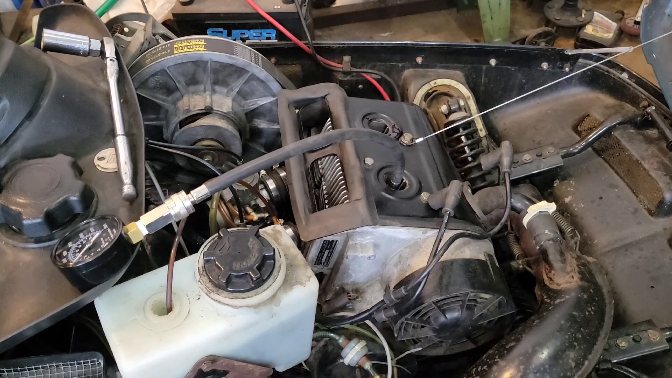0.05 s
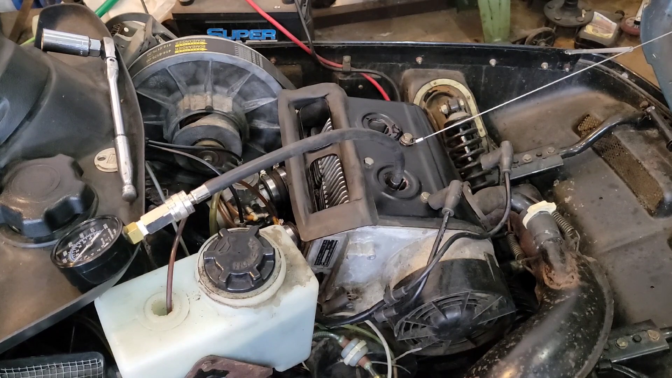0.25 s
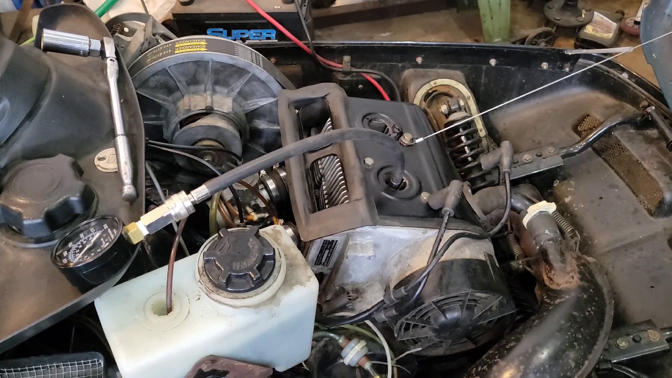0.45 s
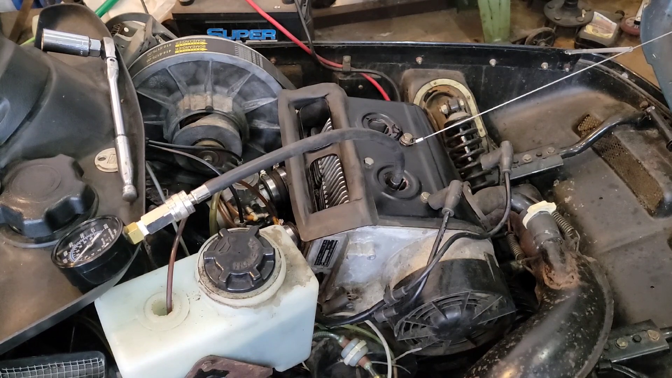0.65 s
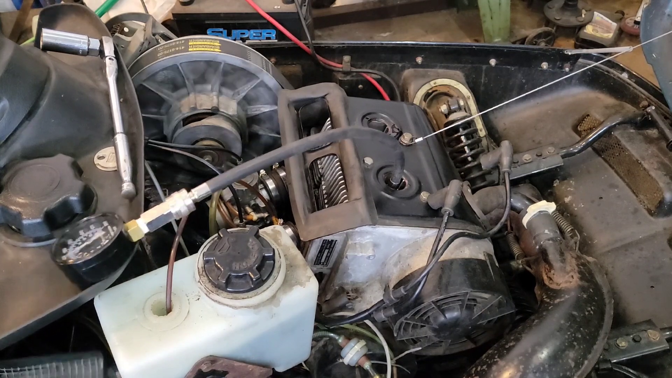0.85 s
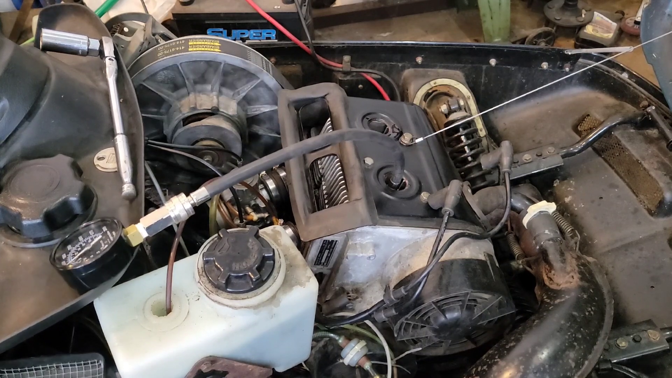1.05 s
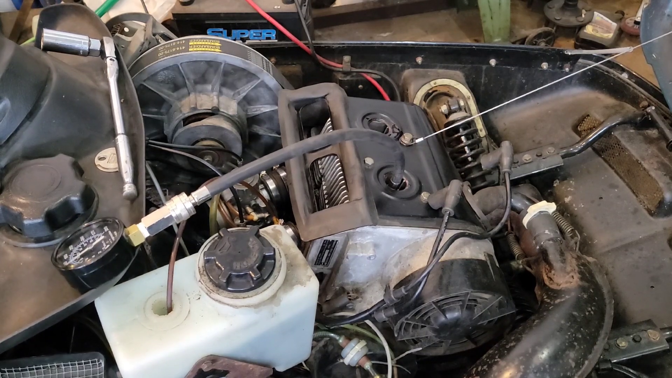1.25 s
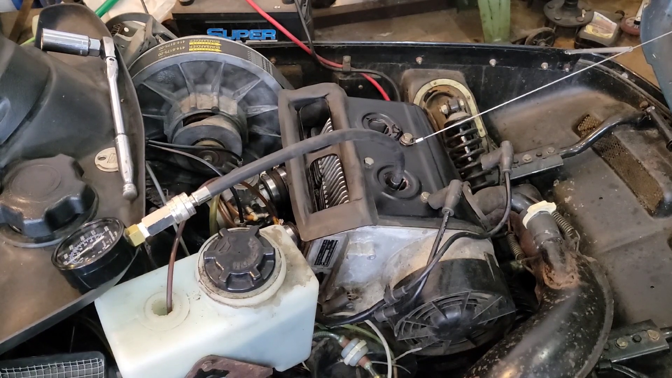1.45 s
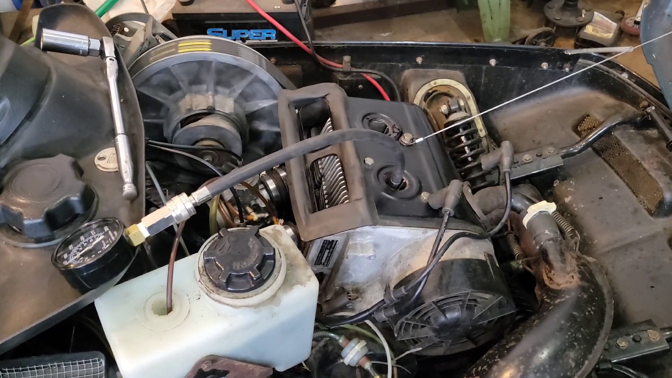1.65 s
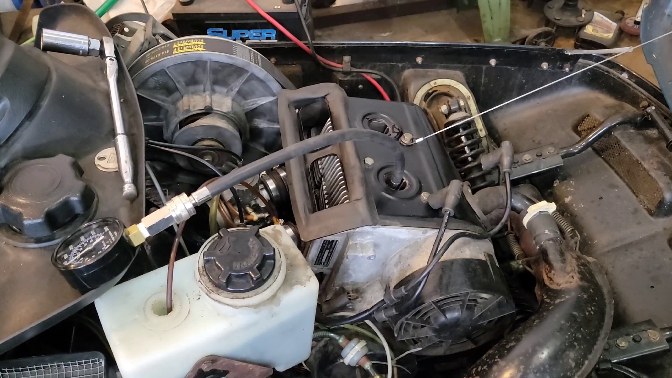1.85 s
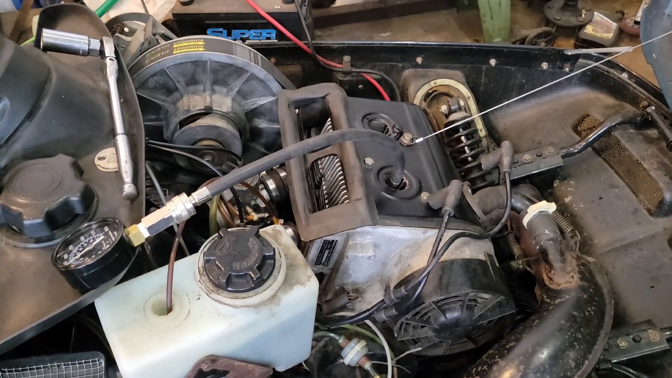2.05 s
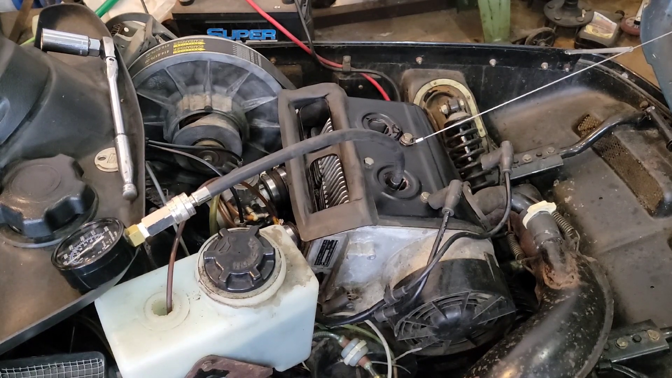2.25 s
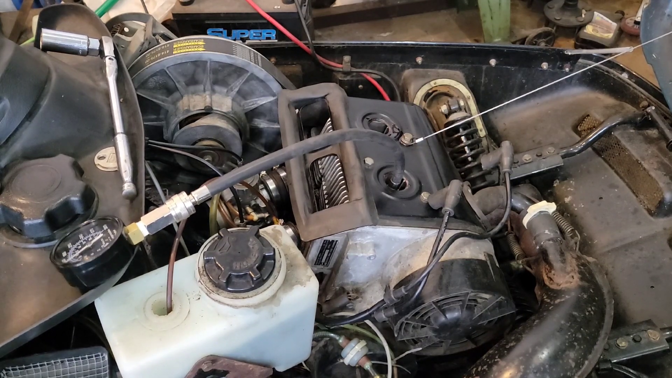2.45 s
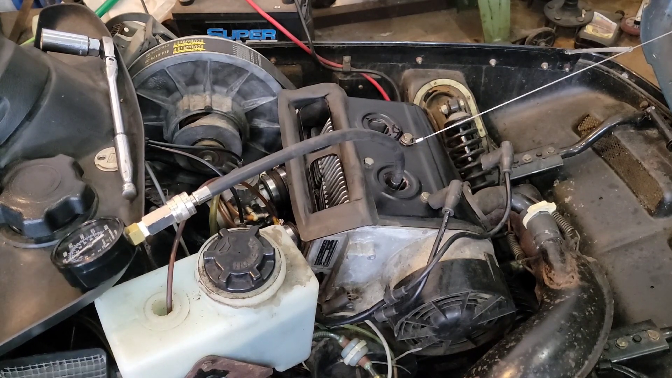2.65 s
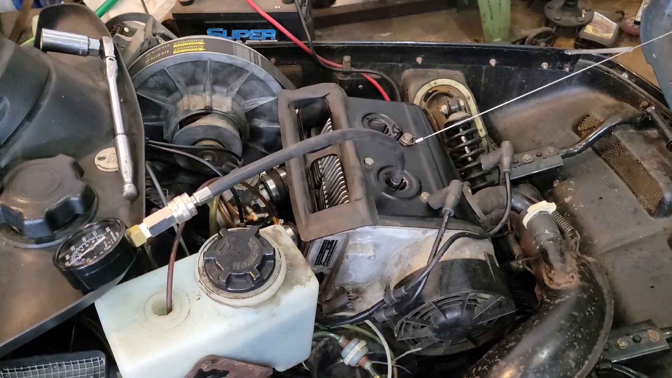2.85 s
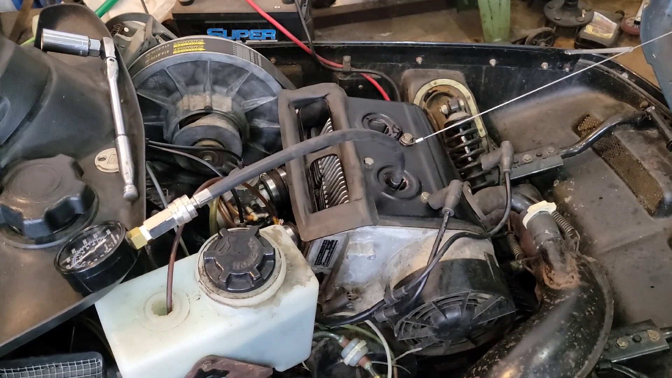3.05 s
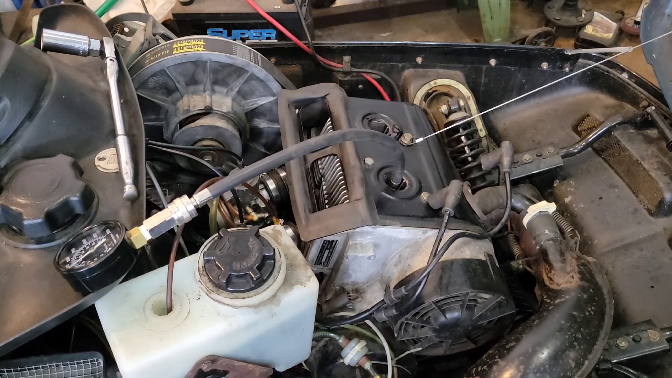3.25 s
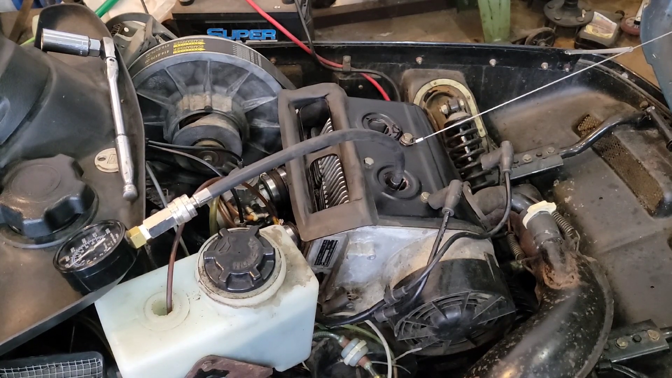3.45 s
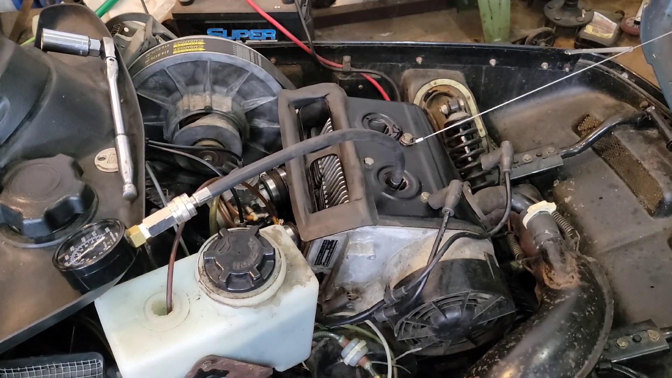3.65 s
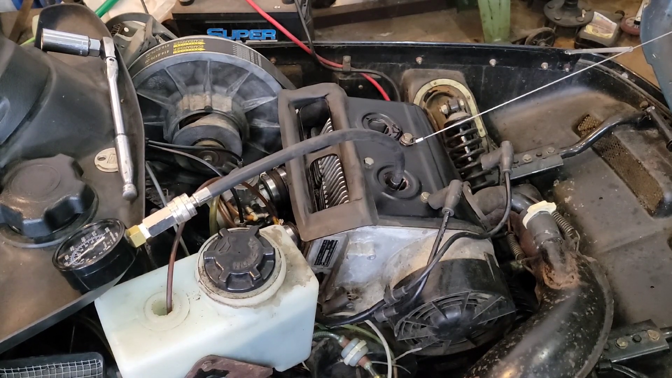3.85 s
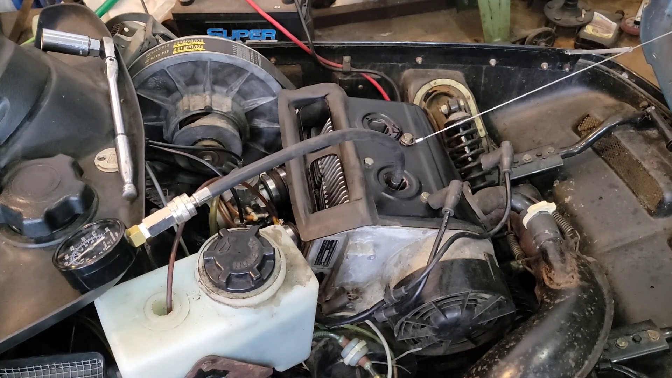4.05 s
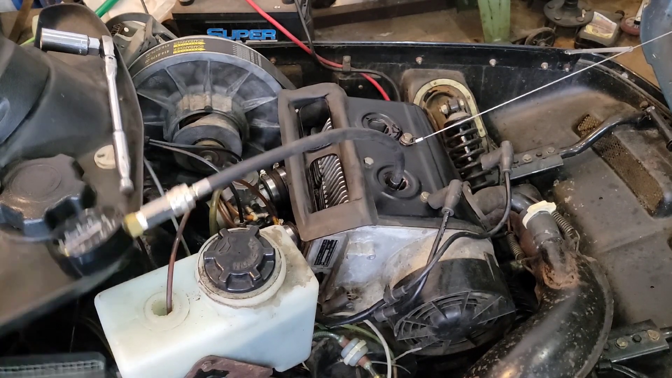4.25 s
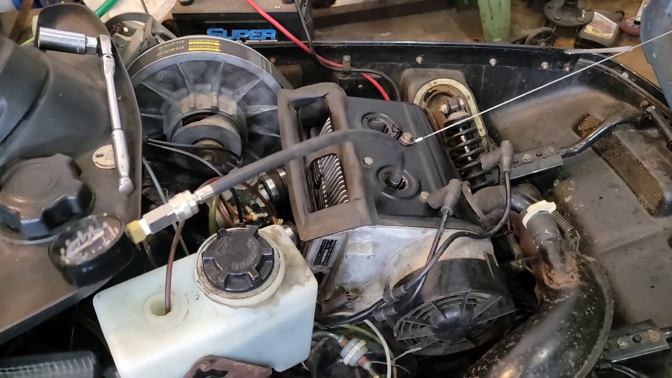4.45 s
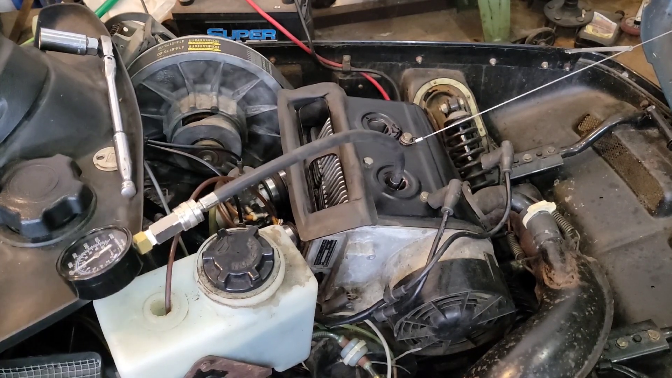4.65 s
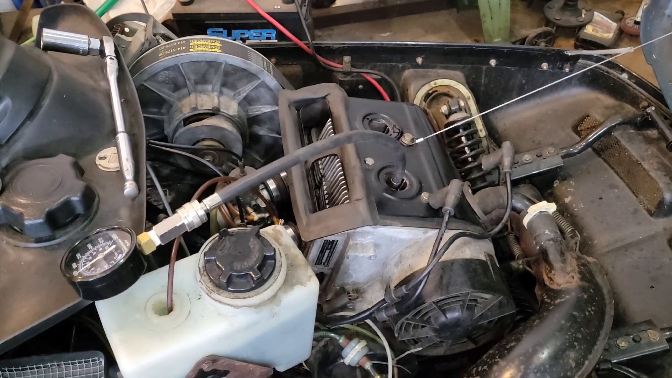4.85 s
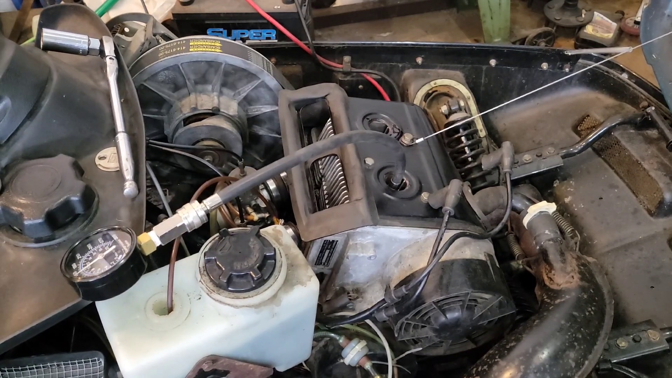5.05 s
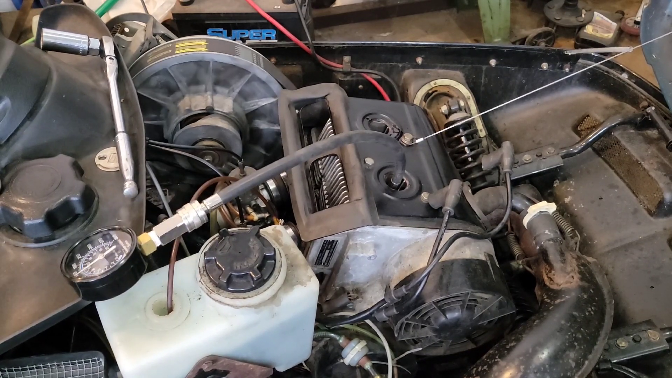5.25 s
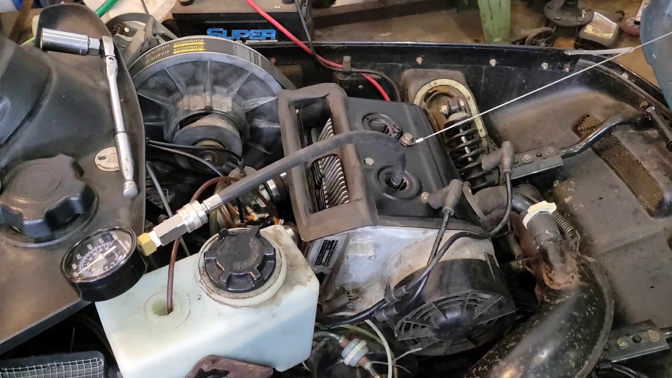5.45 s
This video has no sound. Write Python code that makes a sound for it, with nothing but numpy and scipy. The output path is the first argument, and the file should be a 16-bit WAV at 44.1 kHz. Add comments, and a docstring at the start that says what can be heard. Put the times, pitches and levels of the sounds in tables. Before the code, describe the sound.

A small two-stroke engine is pulled over twice by its starter rope in a garage, chugging briefly with clacks but never firing.

```python
"""A two-stroke twin is pulled over twice by its recoil rope in a garage and never fires.
A compression gauge sits in one plug hole: that cylinder booms into the exhaust, the open one gulps air.
On each pull the crank runs up, holds and coasts; its speed sets the whirr of fan and rings.
The starter clacks, pawls ring, the rope zips and air spurts through the gauge valve. Between the pulls
the rope winds back and its handle knocks; at the end of the second pull the body panels shudder."""
import sys
import numpy as np
from scipy import signal
from scipy.fft import rfft, irfft, next_fast_len
from scipy.io import wavfile
from scipy.ndimage import uniform_filter1d

SR = 44100
rng = np.random.default_rng(int(sys.argv[2]) if len(sys.argv) > 2 else 0)


def wrap_up_sound(samples):
    """Save the sound to the file named by the first command line argument, as 16-bit audio."""
    columns = np.atleast_2d(samples).T
    # keep every value between -1 and 1, then stretch to whole-number steps
    tamed = np.clip(columns, -1, 1)
    steps = np.round(tamed * 32767).astype(np.int16)
    wavfile.write(sys.argv[1], SR, steps)


N = 242991
TIME = np.arange(N) / SR


def pistons():
    """Both cylinders and the crankcase; little radiates below 40 Hz."""
    radiation = signal.butter(4, 40, "high", fs=SR, output="sos")
    return signal.sosfilt(radiation, closed_cylinder() + open_cylinder() + crankcase())


# closed-cylinder strokes: (time [s], level [dB], pitch [Hz], length [s], swell [s])
BOOMS = [(0.785, -35.5, 93.5, 0.064, 0.0044), (0.979, -4, 94, 0.06, .004),
         (1.088, -2.5, 102.8, 0.082, 0.017), (1.19, -4, 100, 0.074, 0.0023),
         (1.315, -7.5, 97.9, .093, 0.0039), (1.48, -7.5, 80.4, .058, 0.0046),
         (1.748, -19.5, 87, 0.067, 0.0067), (4.337, -28, 86, 0.06, 0.0035),
         (4.527, -5.5, 100.9, 0.11, 0.0035), (4.633, -5, 103.5, 0.087, 0.012),
         (4.741, -6.5, 93.3, 0.051, 0.0048), (4.879, -13, 87, 0.084, .01),
         (5.065, -13.5, 85.6, .047, 0.0036)]
# exhaust resonances: (frequency [Hz], width [Hz], gain [dB])
EXHAUST_PEAKS = [(317.6, 27, 2), (384, 25, -7.5)]
# pipe modes: (frequency [Hz], gain [dB], t60 [s])
PIPE_MODES = [(60.5, -16, 0.35), (65, -9.5, 0.19), (77.7, -6.5, 0.69), (104, -24, 1)]
def closed_cylinder(sag=0.25, sag_s=0.022, third_db=-25, flutter=0.13, growl_db=-18):
    """Each stroke pushes out a boom that sags in pitch; the exhaust growls and the pipe rings."""
    booms, flow, age = np.zeros(N), np.zeros(N), TIME[:SR // 5]
    for s, db, hz, length_s, swell_s in BOOMS:
        pitch_hz = hz * (1 + sag * (np.exp(-age / sag_s) - .25))
        phase = 2 * np.pi * np.cumsum(pitch_hz) / SR
        envelope = from_db(db) * (1 - np.exp(-age / swell_s)) * np.exp(-(age / length_s) ** 2)
        span = slice(int(s * SR), int(s * SR) + len(age))
        booms[span] += envelope * (np.sin(phase) + from_db(third_db) * np.sin(3 * phase))
        flow[span] += envelope
    growl = from_db(growl_db) * flow * resonate(rng.standard_normal(N), EXHAUST_PEAKS)
    pipe = strike(*np.transpose(BOOMS)[:2], PIPE_MODES)
    return booms * (1 + flutter * drift(160)) + growl + pipe


# open-cylinder strokes: (time [s], gulp [dB], knock [dB])
GULPS = [(0.917, -7.5, -6.5), (1.044, -6.5, -5), (1.146, -12, -6), (1.254, -8, -6.5), (1.394, -8, -8),
         (1.602, -18.5, -17), (4.469, -7, -4), (4.591, -8, -5.5), (4.691, -6, -7), (4.798, -5.5, -10),
         (4.943, -13.5, -13), (5.039, -14, -15), (5.147, -20, -22), (5.307, -21.5, -32)]
# engine case modes: (frequency [Hz], gain [dB], t60 [s])
CASE_MODES = [(202, -18.5, 0.018), (319.8, -15, 0.38), (397.5, 1, 0.072), (490, -5.5, 0.054),
              (490, -15, 0.033), (734, -20.5, 0.04)]
# dull thud: (frequency [Hz], density [dB])
THUD_SPECTRUM = [(55, -9.5), (130, -11), (370, -5), (520, -6.5), (900, -39)]
def open_cylinder(gulp_hz=110, swell_s=0.0079, fade_s=0.017):
    """Air is gulped through the open plug hole: a low pulse, a pipe ring and a hollow knock."""
    gulps = np.zeros(N)
    for s, db, _ in GULPS:
        age = TIME - s - .001
        envelope = np.exp(np.maximum(np.minimum(age / swell_s, -age / fade_s), -20))
        gulps += from_db(db) * envelope * np.sin(2 * np.pi * gulp_hz * age)
    s, gulp_db, knock_db = np.transpose(GULPS)
    pipe = strike(s, gulp_db, PIPE_MODES)
    knock = strike(s - .001, knock_db - 1.5, CASE_MODES)
    air = colour(bursts(s - .002, knock_db - 12.5, t60_s=0.029, rise_s=0.00082), THUD_SPECTRUM)
    return gulps + pipe - knock + air


def crank_speed(age, run_up_s=.225, full_speed_s=.08, let_go_s=.271, coast_s=.447):
    """Share of top speed against time from the first stroke: run up, hold, coast."""
    run_up = np.clip(1 + (age - full_speed_s) / run_up_s, 1e-4, 1)
    return run_up * np.exp(-np.maximum(age - let_go_s, 0) / coast_s)


# rope pulls: (first stroke [s], spin noise trim [dB])
PULLS = [(0.912, 0.3), (4.459, 0.1)]
# crankcase resonances: (frequency [Hz], width [Hz], gain [dB])
CRANKCASE_PEAKS = [(53, 11, -8.5), (76, 5.7, 1), (131, 30, -1.5), (165, 40, -3)]
def crankcase(top_db=-21.5, speed_exponent=1.89, swell_s=0.063):
    """Air churning in the crankcase rumbles and dies away with crank speed."""
    speed = sum(crank_speed(TIME - s) * np.clip((TIME - s) / swell_s, 0, 1) for s, _ in PULLS)
    rumble = resonate(friction(900, spread_db=3.5, flutter_db=2), CRANKCASE_PEAKS)
    return from_db(top_db) * speed ** speed_exponent * rumble


# fan and rings, rows whirr, rasp, hiss: (level at top speed [dB], speed exponent)
SPIN_NOISE = [(-19.5, 1.49), (-32, 1.22), (-48, 1.1)]
# slack rope in its guide, one curve per slide: (time [s], level [dB])
SLIDES = [
    [(0.0, -60), (0.25, -64), (0.66, -67), (0.76, -49)],
    [(2.48, -67), (2.53, -41.5), (2.76, -42), (3.05, -50.5), (3.21, -62.5), (3.62, -54.5), (3.88, -67.5),
     (4.27, -76)],
]
# noise of the sliding rope: (whirr [dB], rasp [dB], hiss [dB])
SLIDE_NOISE = (0, -4, -31.5)
# noise of the shaking panels: (whirr [dB], rasp [dB], hiss [dB])
SHUDDER_NOISE = (-9, -18.5, -26.5)
def rubbing_levels_db():
    """Whirr, rasp and hiss levels: power sum of spinning crank, sliding rope and panel shudder."""
    top_db, exponent = np.transpose(SPIN_NOISE)[:, :, None]
    parts_db = []
    for s, trim_db in PULLS:
        speed_db = 20 * np.log10(crank_speed(TIME - s))
        take_up_db = -166 * np.clip(s - TIME, 0, 1)   # swells as the rope takes the load
        parts_db.append(top_db + trim_db + exponent * speed_db + take_up_db)
    parts_db += [np.array(SLIDE_NOISE)[:, None] + curve_db(slide) for slide in SLIDES]
    parts_db += [np.array(SHUDDER_NOISE)[:, None] + curve_db(SHUDDER)]
    return 10 * np.log10(sum(from_db(db) ** 2 for db in parts_db))


# rubbing noise bands: (frequency [Hz], density [dB])
WHIRR_SPECTRUM = [(50, 3), (110, 3.5), (230, -7.5), (350, -4.5), (550, -15.5), (800, -9), (1300, -6),
                  (1800, -13.5), (2800, -17.5)]
RASP_SPECTRUM = [(1000, -17), (1700, 0.5), (2700, -1), (3900, -5), (5000, -7.5), (6500, -9.5), (7600, -37),
                 (10000, -39.5)]
HISS_SPECTRUM = [(5500, -4.5), (7000, 5), (8200, -11), (10500, -5), (13200, -1.5), (15500, -6)]
# fan housing resonances: (frequency [Hz], width [Hz], gain [dB])
HOUSING_PEAKS = [(363.4, 12, 0), (501, 29, 3), (622.7, 8.9, 0), (729, 23, 0), (846, 67, -2.5),
                 (1002, 8.4, -2.5), (1405, 82, -14), (1780, 73, -6.5)]
def rubbing():
    """Rope, fan and rings rub: a whirr coloured by the housing, a gritty rasp, a fine hiss."""
    whirr_db, rasp_db, hiss_db = rubbing_levels_db()
    whirr = colour(friction(5000, spread_db=0, flutter_db=3.5), WHIRR_SPECTRUM)
    housing = resonate(friction(1500, spread_db=3.5, flutter_db=4), HOUSING_PEAKS)
    rasp = colour(friction(2500, spread_db=3, flutter_db=6), RASP_SPECTRUM)
    hiss = colour(friction(11000, spread_db=-0.5, flutter_db=3), HISS_SPECTRUM)
    return (from_db(whirr_db + 1) * whirr + from_db(whirr_db - 4) * housing
            + from_db(rasp_db + 2.5) * rasp + from_db(hiss_db + 4) * hiss)


# starter and housing contacts: (time [s], body [dB], crack [dB])
CLACKS = [(0.7724, -22, -18), (0.841, -20, -14.5), (0.8979, -18, -3), (1.0482, -8.5, -26),
          (1.058, -11, -26), (1.4877, -23, -18.5), (1.7237, -24.5, -21), (2.571, -36, -20),
          (2.583, -43, -29), (2.792, -37, -23), (2.88, -44, -27.5), (4.305, -31.5, -27),
          (4.371, -21.5, -23), (4.4442, -15.5, -4), (4.515, -9.5, -13.5), (4.713, -17, -12.5),
          (4.801, -58, 1), (4.8487, -13.5, -3), (4.981, -26, -15.5), (5.037, -17, -9), (5.141, -13.5, -5.5),
          (5.162, -22.5, -21), (5.25, -21, -10)]
# pawls landing in their cup: (time [s], pawl ring [dB], cup ring [dB], crack [dB], scrape [dB])
PAWL_HITS = [(1.321, -13.5, -38, -9, -53), (1.3452, -16, -19, -11.5, -47), (2.029, -57, -42, -21, -35),
             (2.038, -21, -50, -22, -41.5), (2.232, -43, -46, -22.5, -58), (2.242, -37, -50, -28, -60)]
# midrange of a hard contact: (frequency [Hz], density [dB])
KNOCK_SPECTRUM = [(300, -20.5), (560, -1), (760, 0.5), (1050, -3), (1450, -8), (2400, -23)]
def starter_clacks(pawl_body_db=-14.5):
    """Hard contacts whose treble dies first; the pawls scrape on briefly."""
    pawl_clacks = [(s, db + pawl_body_db, db) for s, _, _, db, _ in PAWL_HITS]
    s, body_db, crack_db = np.transpose(CLACKS + pawl_clacks)
    thud = colour(bursts(s, body_db - 6, t60_s=0.3, rise_s=0.003), THUD_SPECTRUM)
    clack = colour(bursts(s, body_db + 7, t60_s=0.083, rise_s=0.0029), KNOCK_SPECTRUM)
    crack = colour(bursts(s, crack_db - 3, t60_s=0.041, rise_s=0.0012), RASP_SPECTRUM)
    tick = colour(bursts(s, crack_db - 12, t60_s=0.022, rise_s=0.0011), HISS_SPECTRUM)
    pawl_s, *_, scrape_db = np.transpose(PAWL_HITS)
    scrape = colour(bursts(pawl_s, scrape_db, t60_s=0.078, rise_s=0.002), HISS_SPECTRUM)
    return thud + clack + crack + tick + scrape


# pawl and starter cup modes: (frequency [Hz], gain [dB], t60 [s])
PAWL_MODES = [(1755, -9, .12), (2024, -2, .04), (2520, -4, .03), (2805, 0, .025), (2965, -17.5, .36),
              (3020, -.5, .03), (3048, -16, .36), (3180, -5, .035), (3850, -7, .02), (5700, -8, .06)]
CUP_MODES = [(1475, -1.5, 0.22), (1684, -4, 0.18), (2180, 1.5, .07), (2517, -3, .14), (3330, -5, .1),
             (4540, 0.5, .06), (4610, -10.5, .14), (5780, -11.5, .1)]
def pawls(skid_s=0.00077):
    """Pawl and cup ring, driven by the short skid of each landing."""
    s, pawl_db, cup_db, _, _ = np.transpose(PAWL_HITS)
    age = TIME[:SR // 8]
    skid = rng.standard_normal(len(age)) * age * np.exp(-age / skid_s)
    white_skid = irfft(flatten(rfft(skid)))[:len(age) // 2]
    ringing = strike(s, pawl_db, PAWL_MODES) + strike(s, cup_db, CUP_MODES)
    return signal.fftconvolve(ringing, white_skid)[:N]


# braid over the guide, per pull: (time from first stroke [s], strand rate [1/s], level [dB])
ROPE_RUN = [(-.14, 550, -45.5), (-.06, 740, -19), (.065, 1000, -22.5), (.2, 1050, -37), (.39, 900, -50.5),
            (.55, 780, -64)]
def rope(jitter=.13):
    """Strands tick unevenly over the guide: a raspy zip that rises and falls with their rate."""
    pulls = [[(s + age, per_s, db) for age, per_s, db in ROPE_RUN] for s, _ in PULLS]
    per_s, db = in_time(np.vstack(pulls))
    pulling = sum((TIME > pull[0][0]) & (TIME < pull[-1][0]) for pull in pulls)
    strands = np.floor(np.cumsum(per_s * (1 + jitter * drift(500))) / SR)
    ticks = np.diff(strands, prepend=0) * (1 + rng.standard_normal(N))
    peaks = [(780, 490, 6.5), (1696, 1070, 1.0), (3020, 1200, -1.5), (4200, 3000, -13)]
    return pulling * from_db(db) * resonate(ticks, peaks)


# panel shake: (time [s], level [dB])
SHUDDER = [(4.845, -23), (4.858, -7.5), (4.935, -11), (4.97, -14.5), (5.016, -16.5), (5.036, -11.5),
           (5.102, -16), (5.17, -18.5), (5.51, -47)]
# panel resonances: (frequency [Hz], width [Hz], gain [dB])
PANEL_PEAKS = [(184.3, 24, 4.5), (272.6, 56, 5), (344, 74, 5), (400, 48, 4), (485, 70, -0.5),
               (590, 58, -5.5), (650, 25, -6.5)]
def panels():
    """The body panels rattle as the second pull runs out."""
    level_db = np.interp(TIME, *np.transpose(SHUDDER), left=-120) - 5
    return from_db(level_db) * resonate(friction(2000, spread_db=1.5, flutter_db=2), PANEL_PEAKS)


# valve spurts: (time [s], level [dB], t60 [s])
SPURTS = [(0.897, -22.5, 0.34), (1.487, -26, 0.038), (4.436, -19.5, 0.25), (4.843, -24, 0.37)]
# air jet: (frequency [Hz], density [dB])
AIR_SPECTRUM = [(1500, -12.5), (3700, -7), (6300, 13), (8000, -5), (11000, 1), (13300, 9), (15500, -14)]
def gauge_valve():
    """Compressed air hisses past the valve."""
    return colour(bursts(*np.transpose(SPURTS), rise_s=0.0015), AIR_SPECTRUM)


# gauge fitting knocks: (time [s], level [dB])
FITTING_HITS = [(4.712, -46), (4.7745, -29.5), (4.803, -19)]
# fitting modes: (frequency [Hz], gain [dB], t60 [s])
FITTING_MODES = [(1813, 9, .2), (1942, 10, .2), (2078, -3, .31), (2348, -3, .35), (3700, 3.5, .15),
                 (4767, 3, .07), (6480, 0, .06), (6912, -1, .17)]
def gauge_fitting():
    """The fitting knocks on metal and rings."""
    return from_db(-3) * strike(*np.transpose(FITTING_HITS), FITTING_MODES)


# high metallic tings: (time [s], level [dB])
TINGS = [(0.842, -24), (1.486, -33), (1.499, -66), (2.8484, -37.5)]
# ting modes: (frequency [Hz], gain [dB], t60 [s])
TING_MODES = [(12800, -2, .06), (13050, -2, .1), (13300, -1, 0.07), (13600, -7, .06)]
def high_tings():
    """Thin, high metallic tings, probably from the gauge valve."""
    return from_db(-12.5) * strike(*np.transpose(TINGS), TING_MODES)


# spinning part running down: (time [s], pitch [Hz], level [dB])
COASTING = [(1.35, 1060, -50), (1.55, 928, -26), (1.85, 831, -33.5), (2.1, 755.4, -39.5), (2.45, 690, -47),
            (3.0, 682, -61), (3.4, 654, -47), (3.8, 578, -67.5), (4.0, 555, -82)]
def coasting(width_hz=170):
    """A spinning part's hollow whirr: a noise band that sinks and fades after the first pull."""
    hz, db = in_time(COASTING)
    phase = 2 * np.pi * np.cumsum(hz) / SR
    whirr = drift(width_hz * 2) * np.cos(phase) + drift(width_hz * 2) * np.sin(phase)
    spinning = (TIME > COASTING[0][0]) & (TIME < COASTING[-1][0])
    return spinning * from_db(db - 4.5) * unit_rms(whirr)


# rope snap: (time [s], level [dB])
SNAP_HITS = [(2.494, -30)]
# snap modes: (frequency [Hz], gain [dB], t60 [s])
SNAP_MODES = [(3930, 7.5, 0.016), (4630, 7, 0.008), (5200, 5, 0.01), (5760, -20, .006), (7100, -28, .004)]
def rope_snap():
    """The rope snaps taut as it starts to wind back."""
    return strike(*np.transpose(SNAP_HITS), SNAP_MODES)


# spool rewinding: (time [s], level [dB])
REWIND = [(2.49, -71), (2.505, -31.5), (2.65, -40.5), (2.70, -27.5), (2.85, -43.5), (3.0, -44), (3.2, -58)]
# spool resonances: (frequency [Hz], width [Hz], gain [dB])
SPOOL_PEAKS = [(80, 30, -9), (112, 23, -8), (185, 30, -7), (270, 26, -5), (479, 100, -10), (587, 76, -4.5),
               (750, 55, -0.5), (953, 160, -7)]
def spool():
    """The spool rattles in its cover while the spring turns it back."""
    rattle = resonate(friction(500, spread_db=-4, flutter_db=-2), SPOOL_PEAKS)
    return from_db(curve_db(REWIND, outside_db=-120)) * rattle


# rope handle knocks: (time [s], body [dB], crack [dB], hood ring [dB])
HANDLE_KNOCKS = [(0.023, -47.5, -51, -46), (0.055, -61, -44, -44.5), (0.072, -47, -49, -55),
                 (0.248, -58, -49.5, -62), (0.266, -51, -48, -71), (0.52, -56, -65, -61),
                 (0.682, -61, -53.5, -58.5), (2.494, -28, -26.5, -56), (2.679, -25, -27.5, -42),
                 (2.766, -35.5, -29, -56), (2.943, -28, -30, -52), (2.988, -36.5, -39, -65),
                 (3.324, -50, -65, -60), (3.466, -49, -43, -54), (3.6203, -38, -33.5, -44),
                 (4.082, -58, -75, -66), (4.2825, -44.5, -43.5, -52)]
# hood modes: (frequency [Hz], gain [dB], t60 [s])
HOOD_MODES = [(362, -2, 0.33), (606, -5, 0.067), (804, -2.5, 0.06), (1260, -8, 0.23), (1910, -11, 0.11),
              (2780, -7, 0.076)]
def handle():
    """The rope handle knocks, clicks and sets the hood ringing."""
    s, body_db, crack_db, ring_db = np.transpose(HANDLE_KNOCKS)
    thud = colour(bursts(s, body_db - 3.5, t60_s=0.073, rise_s=0.0012), THUD_SPECTRUM)
    knock = colour(bursts(s, body_db + 6, t60_s=0.071, rise_s=0.0015), KNOCK_SPECTRUM)
    click = colour(bursts(s, crack_db - 1.5, t60_s=0.049, rise_s=0.00037), RASP_SPECTRUM)
    return thud + knock + click + strike(s, ring_db, HOOD_MODES)


# rubs of the handled rope: (centre [s], half length [s], pitch [Hz], level [dB])
RUBS = [(.4, 0.064, 1640, -58.5), (3.434, 0.088, 2010, -59.5), (3.824, 0.091, 1655, -62)]
def rope_rubs(width_hz=100):
    """Each faint rub swells and fades in one narrow resonance."""
    rubs = np.zeros(N)
    for s, half_s, hz, db in RUBS:
        envelope = from_db(db) * np.exp(-((TIME - s) / half_s) ** 2)
        rubs += envelope * resonate(rng.standard_normal(N), [(hz, width_hz, 0)])
    return rubs


# garage background: (frequency [Hz], density [dB])
ROOM_TONE_SPECTRUM = [(40, -8.5), (110, -8), (230, -11.5), (360, -2), (440, -4.5), (540, 4), (730, -20.5),
                      (1000, -20), (3000, -17), (6500, -25.5), (8500, -46.5), (15000, -51.5)]
def room_tone(level_db=-64):
    """Still garage air: faint steady noise, independent left and right."""
    return from_db(level_db) * colour(rng.standard_normal((2, N)), ROOM_TONE_SPECTRUM)


# garage decay: (frequency [Hz], t60 [s])
GARAGE_T60 = [(150, 0.49), (700, 0.72), (3000, 0.57), (7000, 0.26), (14000, 0.12)]
# left-right likeness: (frequency [Hz], correlation)
CORRELATION = [(100, 1), (250, 0.91), (500, 0.5), (1000, -0.24), (3000, 0.039), (12000, -0.13)]
def garage(x, direct, bay_t60_s, tail_db, width=1):
    """Direct sound, quick engine-bay reflections and the room tail; bass is alike on both sides."""
    age = TIME[:SR // 2]
    hz = np.arange(len(age) // 2 + 1) * SR / len(age)
    centres_hz = np.geomspace(60, 16000, 9)
    white, echoes = rng.standard_normal((2, len(age))), 0
    for centre_hz, band in zip(centres_hz, np.eye(len(centres_hz))):
        bay = from_db(-60 * age / bay_t60_s)
        tail = from_db(tail_db - 60 * age / at_hz(GARAGE_T60, centre_hz))
        echoes = echoes + np.interp(hz, centres_hz, band) * rfft(white * (bay + tail))
    mid, side = flatten(echoes)
    near = direct * (1 + (350 / (hz + 20)) ** 2)   # long waves pass the clutter unscattered
    alike = np.clip(at_hz(CORRELATION, hz), -.95, .999)
    common = np.sqrt(1 + alike) * flatten(near + mid)
    opposed = width * np.sqrt(1 - alike) * side * [[1], [-1]]
    response = irfft(flatten(common + opposed))[:, :len(age) * 4 // 5]
    return signal.fftconvolve(x[None], response, axes=1)[:, :N]


def from_db(db):
    """Decibels to gain."""
    return 10 ** (np.asarray(db) / 20)


def unit_rms(x):
    """Scale to rms 1."""
    return x / np.sqrt(np.mean(x ** 2) + 1e-20)


def in_time(rows):
    """Columns of a curve table at every sample."""
    s, *columns = np.transpose(rows)
    return [np.interp(TIME, s, column) for column in columns]


def curve_db(rows, outside_db=-140):
    """Level at every sample, silent outside the table's span."""
    return np.interp(TIME, *np.transpose(rows), left=outside_db, right=outside_db)


def at_hz(rows, hz):
    """Read a table on a log-frequency axis."""
    row_hz, values = np.transpose(rows)
    return np.interp(np.log(np.maximum(hz, 1)), np.log(row_hz), values)


def flatten(spectrum):
    """Level a response to unit power, keeping its fine ripple."""
    return spectrum / np.sqrt(uniform_filter1d(uniform_filter1d(abs(spectrum) ** 2, size=60), size=60))


def colour(x, spectrum):
    """Minimum-phase filter with steep skirts; white noise keeps its power."""
    size = 2 * next_fast_len(N)
    hz = np.arange(size // 2 + 1) * SR / size
    (low_hz, low_db), (high_hz, high_db) = spectrum[0], spectrum[-1]
    skirted = [(low_hz / 2, low_db - 30), *spectrum, (high_hz * 2, high_db - 30)]
    cepstrum = irfft(np.log(unit_rms(from_db(at_hz(skirted, hz)))))
    cepstrum[1:size // 2] *= 2   # fold onto positive time: causal
    cepstrum[size // 2 + 1:] = 0
    return irfft(rfft(x, size) * np.exp(rfft(cepstrum)))[..., :N]


def drift(rate_hz):
    """Random wander: straight lines between unit normal draws."""
    return np.interp(TIME * rate_hz, np.arange(4000), rng.standard_normal(4000))


def resonate(x, peaks):
    """Parallel resonances (frequency [Hz], width [Hz], gain [dB]) of alternating sign; rms 1."""
    total = np.zeros(N)
    for k, (hz, width_hz, db) in enumerate(peaks):
        b, a = signal.iirpeak(hz, hz / max(width_hz, 10), SR)
        total += (-1) ** k * from_db(db) * signal.lfilter(b, a, x)
    return unit_rms(total)


def strike(times_s, levels_db, modes):
    """Blows ring a body's modes as damped sines, each with about 1 dB of scatter."""
    total = np.zeros(N)
    starts = (np.asarray(times_s) * SR).astype(int)
    for hz, db, t60_s in modes:
        clicks = np.zeros(N)
        clicks[starts] = from_db(levels_db + db + rng.standard_normal(len(starts)))
        radius, angle = from_db(-60 / (t60_s * SR)), 2 * np.pi * hz / SR
        feedback = [1, -2 * radius * np.cos(angle), radius * radius]
        total += signal.lfilter([0, np.sin(angle)], feedback, clicks + 1e-18)
    return total


def bursts(times_s, levels_db, t60_s, rise_s):
    """Noise that flares at each time and decays."""
    power, age = np.zeros(N), TIME[:SR // 2]
    for s, db, decay_s in zip(times_s, levels_db, np.broadcast_to(t60_s, len(times_s))):
        envelope = from_db(db - 60 * age / decay_s) * (1 - np.exp(-age / rise_s))
        start = int(s * SR)
        power[start:start + len(age)] += envelope[:N - start] ** 2
    return np.sqrt(power) * rng.standard_normal(N)


def friction(per_s, spread_db, flutter_db):
    """Dense tiny slips of uneven size and fluttering level; rms 1."""
    slips = (rng.random(N) < per_s / SR) * rng.choice([-1, 1], N)
    size_db = spread_db * np.minimum(rng.exponential(1, N), 4)
    clump_db = flutter_db * np.clip(drift(110), -2, 1)
    return unit_rms(slips * from_db(size_db + clump_db))


def scene():
    """Each group of parts has its own reflections in bay and garage, over the room tone."""
    engine = garage(pistons(), direct=2.2, bay_t60_s=.09, tail_db=-12, width=.6)
    body = garage(panels(), direct=.8, bay_t60_s=.068, tail_db=-13)
    turning = rubbing() + rope() + coasting() + spool() + rope_rubs()
    starter = garage(turning, direct=.6, bay_t60_s=.03, tail_db=-19.5)
    transients = starter_clacks() + rope_snap() + handle() + gauge_valve()
    contacts = garage(transients, direct=.91, bay_t60_s=.037, tail_db=-9.5)
    ringing = pawls() + gauge_fitting() + high_tings()
    metal = garage(ringing, direct=1.8, bay_t60_s=.025, tail_db=-16, width=.6)
    return engine + body + starter + contacts + metal + room_tone()


def record(dry):
    """Soft-clip the peaks, then cut the top steeply."""
    ceiling, cutoff_hz = 1.4, 15900
    rounded = ceiling * np.tanh(dry / ceiling)
    return signal.sosfilt(signal.ellip(10, .2, 80, cutoff_hz, fs=SR, output="sos"), rounded)


dry = scene()
out = record(dry)
wrap_up_sound(out)
```